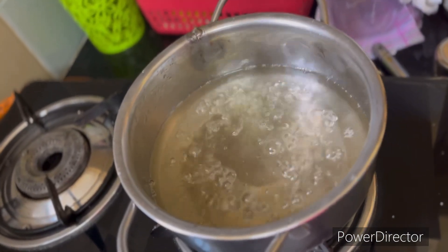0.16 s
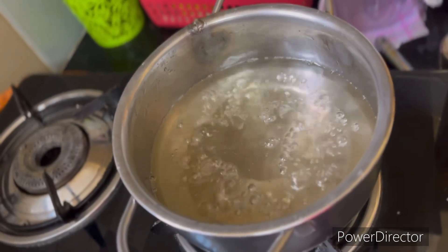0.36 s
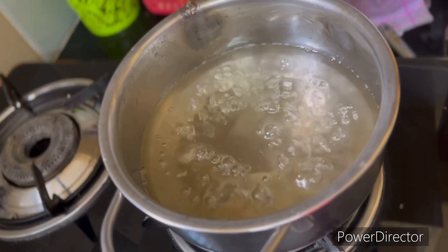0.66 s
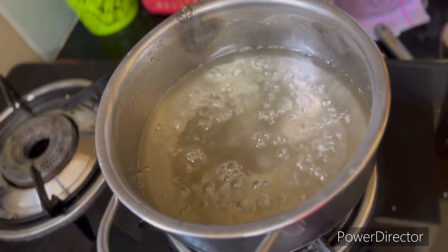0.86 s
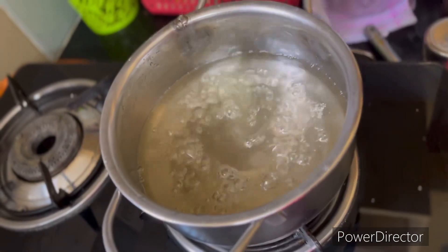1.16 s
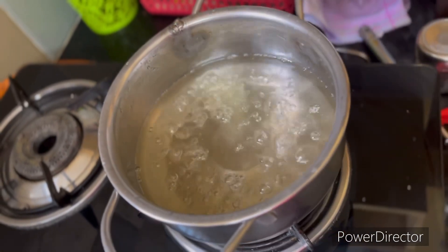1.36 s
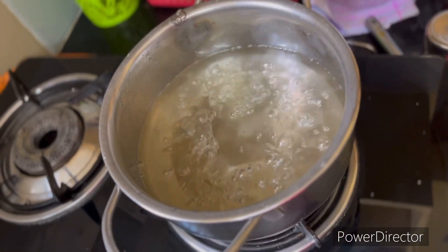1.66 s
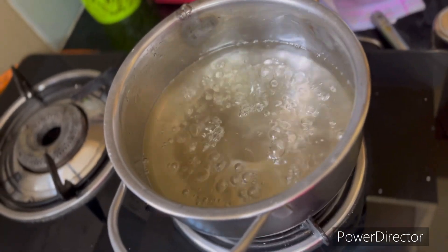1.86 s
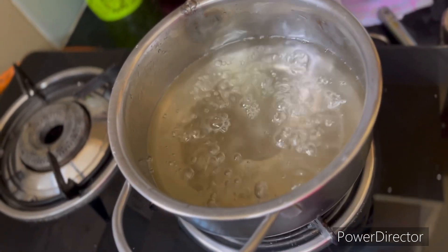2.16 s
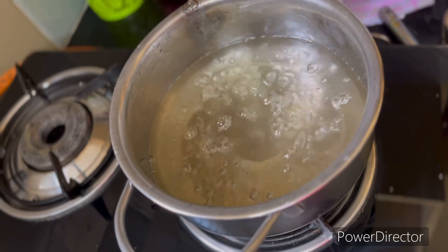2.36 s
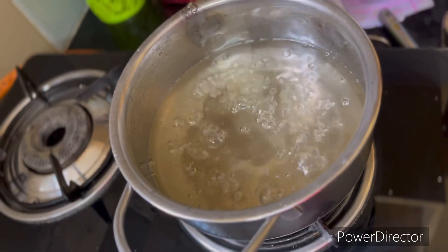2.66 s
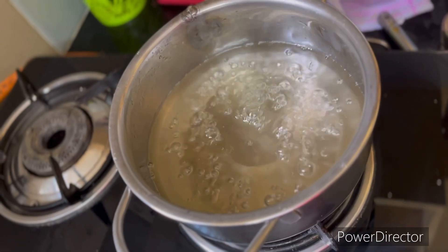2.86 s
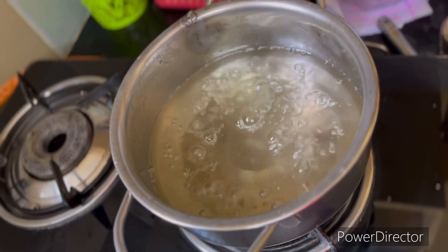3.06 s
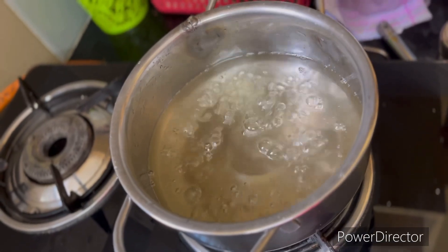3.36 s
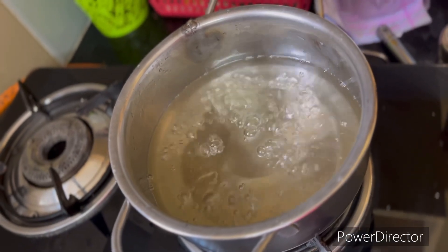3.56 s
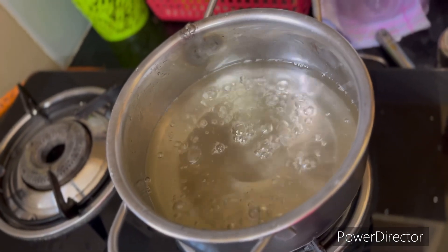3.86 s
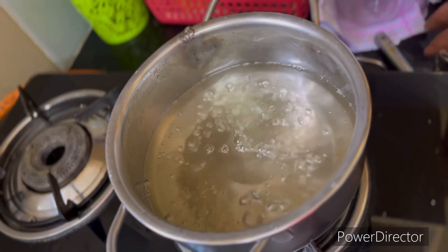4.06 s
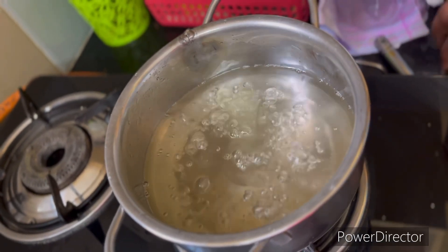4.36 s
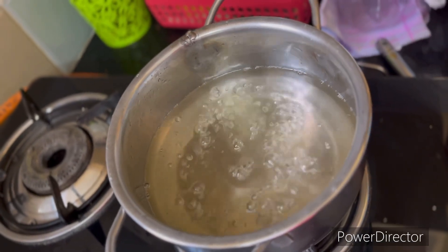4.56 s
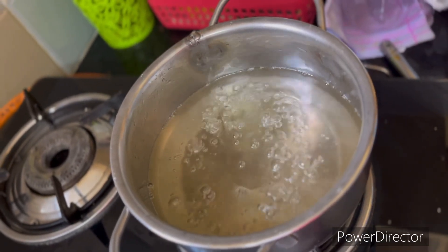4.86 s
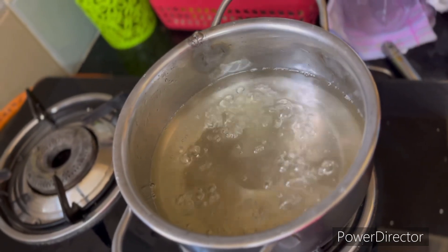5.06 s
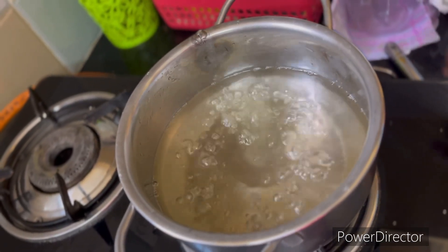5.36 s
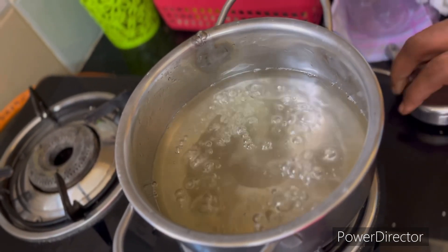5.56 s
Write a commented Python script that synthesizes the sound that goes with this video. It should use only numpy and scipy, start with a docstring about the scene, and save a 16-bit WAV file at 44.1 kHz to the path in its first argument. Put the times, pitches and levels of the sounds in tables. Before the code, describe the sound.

A phone held close to a stove picks up, in stereo, a steady simmer in a steel pot: a low, boomy, fluttering gas roar, midrange boiling, a constant fine hiss and a faint low motor hum. Tiny sharp pops and a few deeper bloops stand out of the froth throughout. A very faint wavering tone slides down in the first quarter second. At about 1.86 s a steel lid drags gritty over the counter, brightening until it drops at 2.06 s with a loud, bright clatter, a quick rattle and a low thud, settling by about 2.2 s. The boil eases slightly after 3.2 s. At 4.7 s a spoon clinks thin and high, bouncing until 4.78 s. Broken bits of the faint tone return at 5.3 to 5.6 s, and at 5.62 s a jar is set down with a hard, quick multiple knock. Short reflections suggest a small hard kitchen.

```python
"""Syrup on the stove

Syrup simmers in a steel pot over a gas flame in a small hard kitchen, heard by a phone with two ports.
Flame, boil and hiss are shaped noise, a near motor hums in sines, and bubbles are short dying tones.
A faint tone slides down in broken pieces. A steel lid is dragged over the counter and dropped, a spoon
clinks and bounces, a jar is set down: each is a force that rings modes, plus broad clatter.
Sparse dying reflections make the room."""
import sys
import numpy as np
from scipy import signal
from scipy.fft import rfft, irfft, next_fast_len
from scipy.io import wavfile
from scipy.ndimage import uniform_filter1d

SR = 44100
rng = np.random.default_rng(int(sys.argv[2]) if len(sys.argv) > 2 else 0)


def waveform_to_disk(signal):
    """Save audio, clipped to [-1, 1], as 16-bit WAV at the path in sys.argv[1]."""
    frames = np.transpose(np.atleast_2d(signal))
    scaled = np.clip(frames, -1, 1) * 32767
    samples = np.round(scaled).astype(np.int16)
    wavfile.write(sys.argv[1], SR, samples)


N = 251760  # samples


def amp(db):
    """Turns dB into gain."""
    return 10 ** (np.asarray(db) / 20)


def evened(x):
    """Scales x to rms 1."""
    return x / np.sqrt(np.mean(x ** 2) + 1e-20)


def wander(shape, size):
    """Smooth chance movement of rms 1: white noise averaged twice over size samples."""
    once = uniform_filter1d(rng.standard_normal(shape), size=size)
    return evened(uniform_filter1d(once, size=size))


def read(points, hz, column=1):
    """Reads a column of a table along log frequency."""
    table = np.transpose(points)
    return np.interp(np.log(hz + 1), np.log(table[0] + 1), table[column])


def shaped(x, gain):
    """Filters x by gain, a function of frequency."""
    size = next_fast_len(x.shape[-1] + 4096)
    spectrum = rfft(x, size) * gain(np.fft.rfftfreq(size, 1 / SR))
    return irfft(spectrum, size)[..., :x.shape[-1]]


def add(mix, s, sound):
    """Mixes sound in at s seconds."""
    part = mix[..., round(s * SR):][..., :sound.shape[-1]]
    part += sound[..., :part.shape[-1]]


def soft_step(t, at_s, width_s):
    """Glides from 0 to 1 around at_s."""
    return (1 + np.tanh((t - at_s) / width_s)) / 2


def noise(colour_db, size, patch_db, flicker_db):
    """Two unrelated noises with shared drifting patches and a flicker common to all pitches."""
    hop = size // 4
    frames, hz = N // hop + 5, np.fft.rfftfreq(size, 1 / SR)
    a, b, c, d, patches = rng.standard_normal((frames, len(hz), 5)).T
    patches = uniform_filter1d(patches, size=8, axis=0)  # smooth across pitch
    patches = evened(uniform_filter1d(patches, size=8, axis=1))  # and across time
    flicker = evened(uniform_filter1d(rng.standard_normal(frames), size=4))
    level_db = colour_db(hz)[:, None] + patch_db * patches + flicker_db * flicker
    spectra = np.array([a + 1j * b, c + 1j * d]) * amp(level_db)
    return evened(signal.istft(spectra, nperseg=size, noverlap=size - hop)[1][:, :N])


# Colour of flame and boil. Each row: frequency in Hz, relative level in dB per Hz.
RUMBLE = [(20, -40), (45, -6), (170, -12), (200, -11), (300, -9), (600, -16.5), (950, -11.5), (1200, -21),
          (1600, -19.5), (2100, -32), (3000, -31)]
# Boomy room and pot resonances. Each row: frequency in Hz, width in Hz, lift in dB.
BOOMS = [(55.3, 16, 9.7), (67, 64, 5.2), (96, 8.6, 3.4), (125.3, 51, 20.7), (148, 22, 4), (275, 37, 2.6),
         (300, 62, 3.5), (360.7, 8.4, 7), (434, 13, 5.6), (430, 5, 0.67), (576, 100, 14.7)]
# Level of the low roar. Each row: time in seconds, level in dB before the flutter.
FLAME = [(0, -54), (1.3, -56), (1.6, -54), (2.7, -55.5), (3.1, -53), (3.7, -57), (4.4, -56.5), (4.65, -52),
         (4.95, -56.5), (5.4, -54.5), (5.71, -56)]
FLUTTER_DB = 1.2  # rms of the flame's quick chance flutter
# The boil settles a little lower partway through.
BOIL_DB, EASE_DB, EASE_AT_S, EASE_S = -54.5, -2.5, 3.26, 0.2


def rumble():
    """Low turbulent noise lifted at the resonances: flame below, boil above."""
    def colour_db(hz):
        booms = sum(db / (1 + (2 * (hz - f) / width) ** 2) for f, width, db in BOOMS)
        return read(RUMBLE, hz) + booms
    both = noise(colour_db, size=4096, patch_db=2.2, flicker_db=1.2)
    flame = shaped(both, lambda hz: 1 / (1 + (hz / 190) ** 8))
    boil = both - flame
    t = np.arange(N) / SR
    boil_db = BOIL_DB + EASE_DB * soft_step(t, EASE_AT_S, EASE_S)
    flame_db = np.interp(t, *np.transpose(FLAME)) + FLUTTER_DB * wander(N, 5000)
    return evened(boil) * amp(boil_db) + evened(flame) * amp(flame_db)


# A motor somewhere near. Each row: multiple of its speed, mean level in dB rms.
HUM = [(1, -61), (2, -64.5), (4, -63.5)]
HUM_HZ = 74.03  # mean speed


def hum():
    """Low orders of a motor share one wandering speed, each swelling and fading on its own."""
    slow = wander((len(HUM) + 1, N), 9000)
    turns = np.cumsum(HUM_HZ * (1 + 0.00546 * slow[-1])) / SR
    field_phase = np.array([[0], [np.pi / 2]])  # a quarter cycle between the two fields
    out = np.zeros((2, N))
    for (order, db), swell in zip(HUM, slow):
        tone = np.sqrt(2) * np.sin(2 * np.pi * order * turns + field_phase)
        out += amp(db + 0.45 * swell) * tone
    return out


# Gas jets and finest froth. Each row: frequency in Hz, relative level in dB per Hz.
HISS = [(600, 3.5), (1500, 1.5), (2200, -3), (2650, 1), (3300, -1), (4400, 1.5), (5500, -3.5), (8200, 2),
        (10500, 1), (12500, -2), (15800, -4.5)]
HISS_DB = -53.5  # rms


def hiss():
    """Turbulence of the gas jets and the finest froth as flickering high noise."""
    return amp(HISS_DB) * noise(lambda hz: read(HISS, hz), size=1024, patch_db=1.5, flicker_db=1.34)


def bubble(hz, cycles, rise):
    """A tone that dies to 1/e in some cycles while its pitch rises by the share rise."""
    u = np.arange(int(6 * cycles * SR / hz) + 2) * hz / (cycles * SR)  # time in decay lengths
    tone = np.sin(2 * np.pi * cycles * (u + rise * u ** 2 / 2))
    return tone * np.exp(-u) * (1 - np.exp(-8 * u))


def froth(low_hz, high_hz, per_s, spread_db, cycles, count=24):
    """Countless small bubbles of all sizes burst at random; a few are loud."""
    loudness = amp(spread_db * np.minimum(rng.exponential(1, (2, N)), 5))
    bursting = loudness * (rng.random(N) < per_s / SR)
    kind = rng.integers(0, count, N)
    out = np.zeros((2, N))
    for k, hz in enumerate(np.geomspace(low_hz, high_hz, count)):
        tone = bubble(hz, cycles, 0.0977)[None]
        out += signal.oaconvolve(bursting * (kind == k), tone)[:, :N]
    return evened(out)


# Pieces of the faint tone. Each row: start in seconds, length in seconds, level in dB at mid-swell,
# first pitch in Hz, fall in Hz per second.
FAR_TONE = [(0.019, 0.24, -60.5, 737, 430), (5.323, 0.13, -59, 768, 12), (5.459, 0.053, -48.5, 737, 200),
            (5.542, 0.045, -61, 679, 100)]
SWELL_DB = 2  # mid-swell over the ends


def far_tone():
    """A broken, wavering sine that swells, slides down and fades."""
    out = np.zeros(N)
    for s, length, db, hz, fall in FAR_TONE:
        t = np.arange(0, length, 1 / SR)
        waver = evened(uniform_filter1d(rng.standard_normal((2, SR // 2)), size=900))[:, :len(t)]
        pitch = hz - fall * t + 8 * waver[0]
        tone = np.sin(2 * np.pi * np.cumsum(pitch) / SR)
        level_db = db - SWELL_DB * (2 * t / length - 1) ** 2 + 4.3 * waver[1]
        add(out, s, amp(level_db) * tone * signal.windows.tukey(len(t), .3))
    return out


# Bubbles that stand out, from large slow ones to tiny sharp ones.
# Each row: start in seconds, level in dB, pitch in Hz.
BUBBLES = [(0.377, -41, 1080), (0.502, -38, 4650), (0.5786, -40, 4470), (0.588, -42, 120),
           (0.756, -45, 135), (1.2624, -35, 11000), (1.488, -34, 7140), (1.5596, -36, 6400),
           (2.847, -30.5, 10700), (2.85, -38.5, 690), (3.397, -37, 6050), (3.639, -40, 427),
           (3.692, -31.5, 10200), (3.763, -35, 6240), (3.8264, -39, 6630), (4.266, -31, 11200),
           (4.416, -36, 6540), (4.556, -35.5, 6400), (4.645, -40.5, 1270), (4.887, -49, 6200)]
BUBBLE_CYCLES, BUBBLE_RISE = 1.67, 0.017  # cycles to 1/e, share the pitch rises meanwhile


def bursts():
    """Single bubbles pop out of the froth, each a very short dying tone."""
    out = np.zeros(N)
    for s, db, hz in BUBBLES:
        add(out, s, amp(db) * bubble(hz, BUBBLE_CYCLES, BUBBLE_RISE))
    return out


def ring(force, modes, ring_db, column=1):
    """A force sets an object's modes ringing; each field meets each mode at its own phase."""
    t, table = np.arange(SR // 4) / SR, np.transpose(modes)
    hz, db, t60 = table[[0, column, -1], :, None]
    phase = rng.uniform(0, 2 * np.pi, (2, len(modes), 1))
    tones = amp(db - 60 * t / t60) * np.sin(2 * np.pi * hz * t + phase)
    tones *= np.sqrt(4 * np.log(1000) / (t60 * SR))  # about energy 1 at 0 dB, before the build-up
    tones *= 1 - np.exp(-t * hz)  # a mode takes a few cycles to build up
    return amp(ring_db) * signal.oaconvolve(force, tones.sum(1), axes=1)[:, :N]


def tilted(x, db_per_octave):
    """Tilts the spectrum about 4 kHz."""
    return shaped(x, lambda hz: amp(db_per_octave * np.log2((hz + 100) / 4000)))


def blows(rows, modes, clatter, ring_db, column=1):
    """Each contact is one sharp push on the modes and a short dying chatter."""
    push, chatter, t = np.zeros((1, N)), np.zeros((2, N)), np.arange(2000) / SR
    for s, db, tilt_db, contact in rows:
        push[0, round(s * SR)] = amp(db) * np.sqrt(contact * SR / 2)
        envelope = np.exp(-t / contact) * (1 - np.exp(-t / 0.00011))
        burst = rng.standard_normal((2, len(t))) * envelope
        add(chatter, s, amp(db) * tilted(burst, tilt_db))
    return ring(push, modes, ring_db, column) + shaped(chatter, lambda hz: amp(read(clatter, hz)))


def rub(s, level_db, bright, grit_db):
    """Gritty stick-slip force from s seconds on, a blend of a dull and a bright stroke."""
    grit = amp(grit_db * evened(uniform_filter1d(rng.standard_normal(SR // 4), size=90)))
    flat = evened(rng.standard_normal((2, SR // 4)) * grit)[:, :len(level_db)]
    share = np.clip(bright, 0, 1)
    stroke = (1 - share) * tilted(flat, -2.07) + share * tilted(flat, 4.9)
    force = np.zeros((2, N))
    add(force, s, amp(level_db) * stroke * signal.windows.tukey(len(level_db), .02))
    return force


# Lid modes. Each row: frequency in Hz, relative levels in dB early in the drag, late in the drag,
# struck and rattling, then t60 in seconds.
LID = [(110, -2, 4, -8, -3, .12), (290, -6, -10, -12, -2, .06), (390, -1, -3, -2, -4, .06),
       (620, -1, -7, -11, -9, .05), (960, 5, 4, -2, 0, .05), (1010, 1, 0, 3, 2, .04),
       (1130, 3, 1, 9, 2, .05), (1282, 2, 0, -2, 3, .06), (1593, 3, -3, -6, -5, .04),
       (1710, -1, -6, -10, -9, .04), (1935, -14, -10, -12, -6, .04), (2227, -12, -10, 2, -2, .06),
       (2345, -12, -12, 2, -3, .04), (2500, -8, -9, 4, -5, .035), (2600, -12, -5, -6, -6, .04),
       (3135, -8, -3, -2, 2, .05), (3275, -12, -1, 5, 0, .035), (3325, -12, 2, 6, 1, .04),
       (3365, -13, 0, 8, 3, .05), (3405, -12, -4, 2, -2, .04), (3500, -8, -8, -2, -5, .04),
       (3930, 0, -1, -6, -4, .06), (4133, -5, -6, -4, -7, .06), (4500, -12, -12, -3, -3, .04),
       (4635, 4, -2, -6, -5, .05), (5130, -14, -14, -1, 2, .05), (5480, -9, -5, -4, -6, .04),
       (5685, -8, -6, -4, 0, .05), (6155, -14, -12, -6, -7, .05), (6562, -12, -10, 0, -2, .06),
       (6700, -12, -7, -4, -1, .05), (6853, -14, -12, -8, -1, .04), (7610, -5, -9, -4, -3, .05),
       (7780, -12, -8, 0, -1, .05), (7865, -5, -2, -6, -9, .07), (8930, -9, -3, -12, -5, .04),
       (9394, -10, -12, 5, -1, .06), (10125, -14, -12, -8, -3, .04), (10335, -12, -14, -3, -6, .05),
       (11230, -16, -4, -6, -6, .04), (11700, -18, -9, -9, -9, .04), (11950, -18, -12, -6, -5, .04),
       (12440, -18, -10, 1, -10, .03), (13890, -24, -20, -4, -16, .04)]
# Broad clatter of the lid. Each row: frequency in Hz, gain in dB.
LID_CLATTER = [(70, -36), (110, -4), (200, -16), (500, -0.5), (1100, 5.5), (1450, -9), (2300, -8),
               (2800, -2.5), (3300, -7), (3750, -7), (4300, -0.5), (4850, -8), (5600, -8), (7000, 1.5),
               (10000, -1), (12000, -34), (13500, -16), (15500, -36)]
# Friction of the drag. Each row: time in seconds, level in dB.
DRAG = [(1.862, -41.5), (1.875, -42), (1.905, -44), (1.93, -38.5), (1.95, -39.5), (1.985, -40.5),
        (2.02, -47), (2.056, -55)]
# Blows of the dropped lid. Each row: start in seconds, level in dB, brightness in dB per octave,
# contact in seconds.
LID_STRIKE = [(2.0605, -23.5, 4, 0.004), (2.0655, -27, 4, 0.005)]
DRAG_BRIGHT, BRIGHTEN_S = 0.53, 0.11  # the scrape starts dull and brightens towards this share (0-1)
SHIFT_AT_S, SHIFT_S = 0.092, 0.02  # into the drag, the rubbing point slides and wakes other modes
RATTLE_S, RATTLE_DB, RATTLE_RISE_S, RATTLE_BRIGHT = 2.06, -21.5, 0.0048, 0.67
RATTLE_DB_PER_S = 176  # fade from the start
SETTLE_AFTER_S, SETTLE_DB_PER_S = 0.079, 554  # extra fade as the lid settles fast
EARLY_RING_DB, LATE_RING_DB, STRUCK_RING_DB, RATTLE_RING_DB = -14, -11, -10, -17
THUD_S, THUD_DB, THUD_HZ, THUD_CYCLES = 2.117, -34, 113, 2.3


def lid_drag():
    """Friction of the lid over the counter, brightening as it goes."""
    s, db = np.transpose(DRAG)
    t = np.arange(0, s[-1] - s[0], 1 / SR)
    bright = DRAG_BRIGHT * np.minimum(t / BRIGHTEN_S, 1)
    return rub(s[0], np.interp(t + s[0], s, db), bright, grit_db=2.8)


def lid_rattle():
    """Gritty force of the dropped lid rattling to rest."""
    t = np.arange(SR // 5) / SR
    fade_db = RATTLE_DB_PER_S * t + SETTLE_DB_PER_S * np.maximum(t - SETTLE_AFTER_S, 0)
    rise_db = 20 * np.log10(np.minimum(t / RATTLE_RISE_S, 1) ** 2 + 1e-3)
    return rub(RATTLE_S, RATTLE_DB + rise_db - fade_db, RATTLE_BRIGHT, grit_db=1.4)


def lid():
    """Drag, blows and rattle clatter and ring the steel; the counter booms as the lid settles."""
    drag, rattle = lid_drag(), lid_rattle()
    clatter = shaped(drag + rattle, lambda hz: amp(read(LID_CLATTER, hz)))
    late = soft_step(np.arange(N) / SR, DRAG[0][0] + SHIFT_AT_S, SHIFT_S)
    early_ring = ring(drag * np.sqrt(1 - late), LID, EARLY_RING_DB)
    late_ring = ring(drag * np.sqrt(late), LID, LATE_RING_DB, column=2)
    struck = blows(LID_STRIKE, LID, LID_CLATTER, STRUCK_RING_DB, column=3)
    rattling = ring(rattle, LID, RATTLE_RING_DB, column=4)
    thud = np.zeros(N)
    add(thud, THUD_S, amp(THUD_DB) * bubble(THUD_HZ, THUD_CYCLES, 0))
    return clatter + early_ring + late_ring + struck + rattling + thud


# Spoon modes. Each row: frequency in Hz, relative levels in dB struck at the tip, the bowl and
# the handle, then t60 in seconds.
SPOON = [(1421, -30, -18, -30, .04), (1800, -30, -28, -14, .03), (2250, -28, -22, -14, .04),
         (2600, -25, -16, -16, .03), (2930, -25, -22, -19, .04), (3500, -18, -13, -16, .04),
         (3660, -20, -18, -8, .045), (4150, -15, -11, -12, .04), (4800, -15, -17, -11, .02),
         (5430, -5, -9, -6, .04), (6360, 2, -4, -2, .065), (7210, -14, -15, -20, .06),
         (8050, -8, -13, -20, .03), (8484, 9, -6, -25, .13), (8600, -14, -16, 1, .015),
         (8870, -14, -20, -6, .015), (9600, -18, -8, -11, .03), (10750, 2, -1, -22, .025),
         (11830, -25, -1, -6, .12), (12740, 1, -10, -25, .035), (13850, -2, -12, -5, .02),
         (14120, 1, -5, -6, .03), (14380, -10, -14, 1, .015)]
# Broad clatter of the spoon. Each row: frequency in Hz, gain in dB.
SPOON_CLATTER = [(700, -38), (1500, -4), (3000, 3), (6000, 7), (9000, 4.5), (13500, 5), (14600, -4),
                 (15500, -14)]
# The clink and its bounces. Each row: start in seconds, level in dB, brightness in dB per octave,
# contact in seconds, part struck.
CLINKS = [(4.6935, -33, 6, 0.003, "tip"), (4.7056, -33, 6, 0.005, "bowl"), (4.712, -33, -2, 0.007, "bowl"),
          (4.722, -43, 3, 0.014, "bowl"), (4.75, -50, 5, 0.018, "bowl"), (4.7749, -33, -2, 0.004, "handle"),
          (4.778, -36, -3, 0.007, "handle")]


def spoon():
    """Tip, bowl and handle ring the same modes in other shares."""
    out = np.zeros((2, N))
    for column, part in enumerate(("tip", "bowl", "handle"), start=1):
        rows = [row[:-1] for row in CLINKS if row[-1] == part]
        out += blows(rows, SPOON, SPOON_CLATTER, ring_db=0, column=column)
    return out


# Jar modes. Each row: frequency in Hz, relative level in dB, t60 in seconds.
JAR = [(127, -6, 0.25), (310.4, -15, 0.12), (600, -17, 0.1), (990, -6, .03), (1380, 4, 0.035),
       (1700, -3, .02), (1930, 0, 0.02), (2070, 2, .02), (2365, 3, .018), (2505, 1, .02), (2928, -9, .03),
       (3229, -8, .03), (3740, -3, .02), (3910, 1, 0.022), (4145, -1, .025), (4330, -2, .02),
       (4695, -7, .08), (4965, -6, .08), (5055, -1, 0.04), (5250, -2, .07), (5645, 0, 0.045),
       (6180, -1, 0.035), (6540, 0, .055), (7800, -5, 0.016), (9815, -5, .025), (10185, -4, .02),
       (10786, -1, 0.2)]
# Broad clatter of the jar. Each row: frequency in Hz, gain in dB.
JAR_CLATTER = [(100, -33), (300, 5), (1000, 4.5), (1400, 3), (2200, 14), (3100, 0.5), (4000, 15), (4700, 0),
               (6500, 6), (8500, 3), (12500, -7), (14000, -16), (15500, -18)]
# Contacts of the jar. Each row: start in seconds, level in dB, brightness in dB per octave,
# contact in seconds.
SET_DOWN = [(5.6238, -25, 1, 0.005), (5.6265, -30, 3, 0.0044), (5.6305, -32, 1, 0.0074),
            (5.637, -34, 3, 0.005), (5.646, -37, 2, 0.01)]


def jar():
    """A few quick contacts ring the jar as it is set down."""
    return blows(SET_DOWN, JAR, JAR_CLATTER, ring_db=-10)


# Decay of the room. Each row: frequency in Hz, t60 in seconds.
KITCHEN = [(100, 0.3), (500, 0.25), (2000, 0.36), (7000, 0.33), (12000, 0.21)]


def kitchen(x):
    """Sparse reflections of random sign, each band dying at its own speed."""
    taps = np.zeros((2, SR // 2))
    at = np.arange(120, SR // 2 - 20, 20)
    at = at + rng.integers(0, 20, (2, len(at)))
    np.put_along_axis(taps, at, rng.choice([-1., 1.], at.shape), 1)
    hz, t, bands = signal.stft(taps, SR, nperseg=256)
    decay = amp(-60 * t / read(KITCHEN, hz)[:, None])
    tail = signal.istft(bands * decay, SR, nperseg=256)[1]
    return signal.fftconvolve(x, tail / np.linalg.norm(tail[0]), axes=1)[:, :N]


def scene():
    """Two sound fields, the one at the left port and an unrelated second one, with reflections of all but the
    steady sounds."""
    steady = rumble() + hum() + hiss()
    fine_froth = amp(-70) * froth(2990, 15500, per_s=1500, spread_db=5.6, cycles=2.6)
    coarse_froth = amp(-62) * froth(328.6, 999, per_s=600, spread_db=3.2, cycles=4.25)
    bubbles = fine_froth + coarse_froth + bursts()
    tone, steel, clinks, glass = far_tone(), lid(), spoon(), jar()
    echoing = amp(-4.5) * steel + amp(-7) * clinks + amp(-9) * glass
    echoing = echoing + amp(-3.5) * bubbles + amp(-6) * tone
    return steady + steel + clinks + glass + bubbles + tone + kitchen(echoing)


# The two ports. Each row: frequency in Hz, likeness (0-1), lead of the left in radians,
# left over right in dB.
PORTS = [(60, .96, 0, -.5), (160, .93, .1, 1), (520, .75, .4, 3), (1200, .3, .7, 1.5), (1900, .7, .3, 1),
         (2600, .6, .8, .5), (3300, .35, 1.3, 1.3), (4000, .2, .3, 2.5), (4650, .38, 1.1, 3),
         (5350, .05, 0, 2), (6000, .47, -1.4, 1.5), (6800, .55, -1.6, 1), (7400, .75, -2.4, .5)]
# Above that the ports largely share one field, in or out of step.
# Each row: frequency in Hz, likeness (0-1), lead of the left in half turns.
TREBLE = [(7750, 1, -1), (8850, 1, -1), (9400, .72, -1.25), (10200, .66, -1.55), (10900, .8, -1.8),
          (11150, 1, -2), (13000, 1, -2), (13500, .55, -2.4), (14300, .66, -2.8), (14650, 1, -3)]
BASS_CUT_HZ, EDGE_HZ = 40, 15850  # the deepest bass is cut away; top of the band


def record(dry):
    """The right port hears the left field shifted in phase and mixed with another; then the band limit."""
    dry = shaped(dry, lambda hz: 1 / np.sqrt(1 + (BASS_CUT_HZ / (hz + 1)) ** 4))
    ports = PORTS + [(hz, likeness, np.pi * half_turns, 0) for hz, likeness, half_turns in TREBLE]

    def same(hz):
        return np.clip(read(ports, hz), 0, 1)
    left = shaped(dry[0], lambda hz: amp(read(ports, hz, column=3) / 2))
    shared = shaped(dry[0], lambda hz: same(hz) * np.exp(-1j * read(ports, hz, column=2)))
    own = shaped(dry[1], lambda hz: np.sqrt(1 - same(hz) ** 2))
    right = shaped(shared + own, lambda hz: amp(-read(ports, hz, column=3) / 2))
    band = signal.firwin(1023, EDGE_HZ, window=("kaiser", 10), fs=SR)
    return signal.oaconvolve(np.array([left, right]), band[None], "same")


dry = scene()
out = record(dry)
waveform_to_disk(out)
```